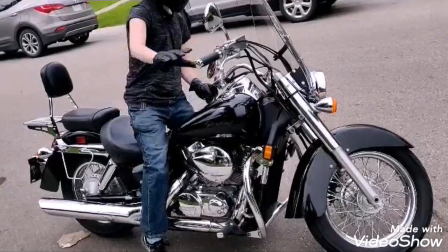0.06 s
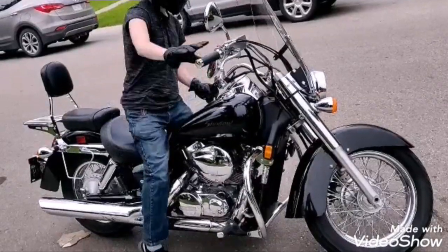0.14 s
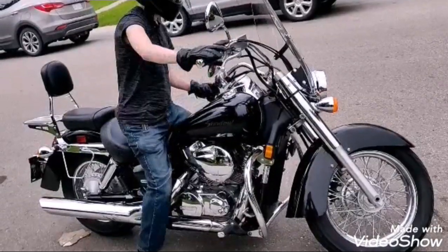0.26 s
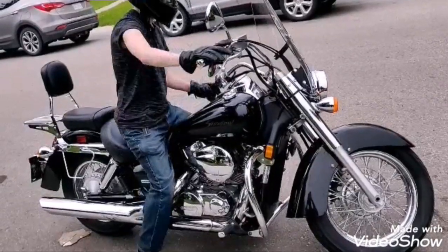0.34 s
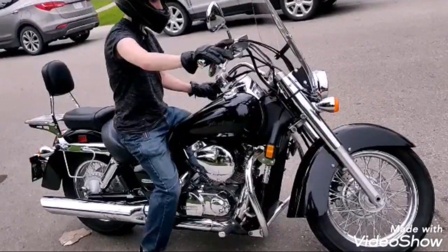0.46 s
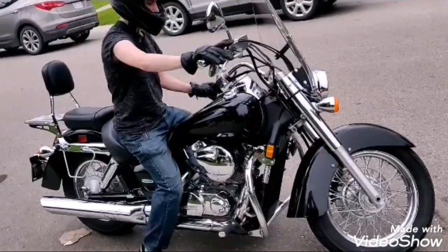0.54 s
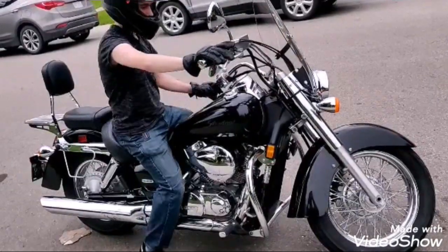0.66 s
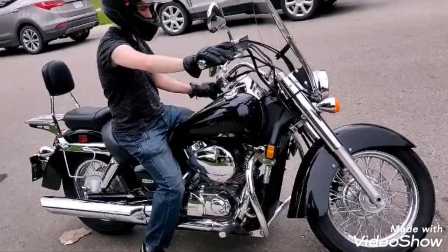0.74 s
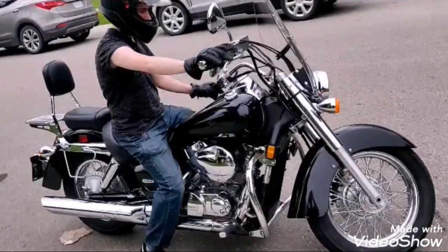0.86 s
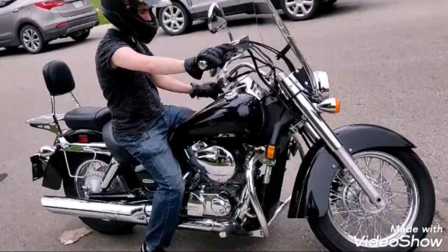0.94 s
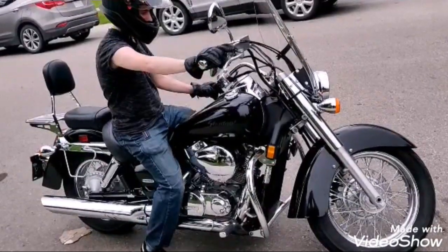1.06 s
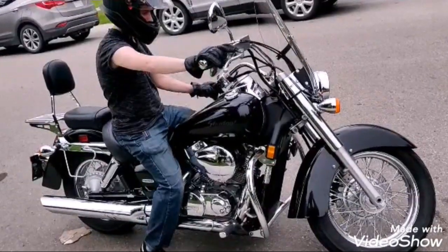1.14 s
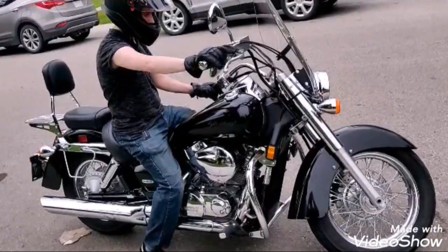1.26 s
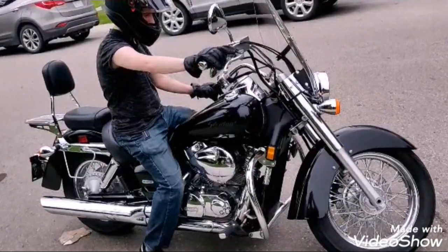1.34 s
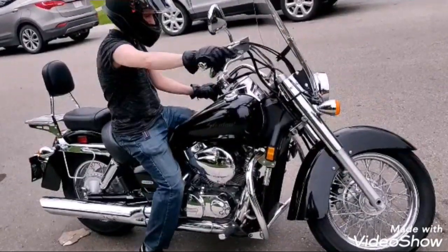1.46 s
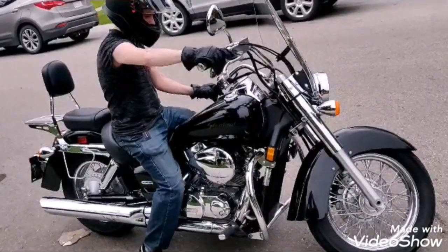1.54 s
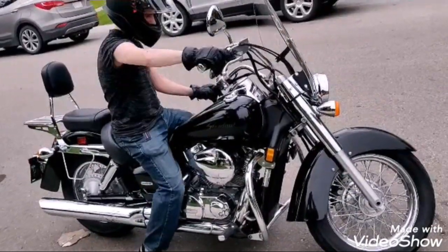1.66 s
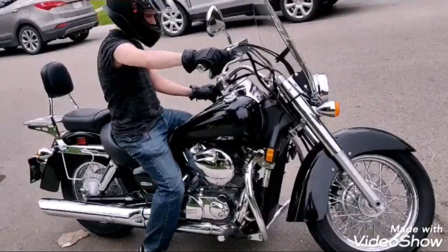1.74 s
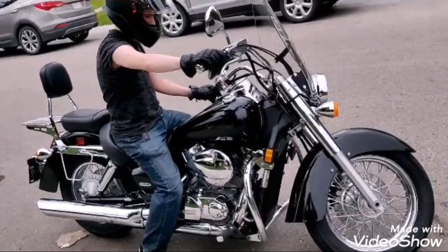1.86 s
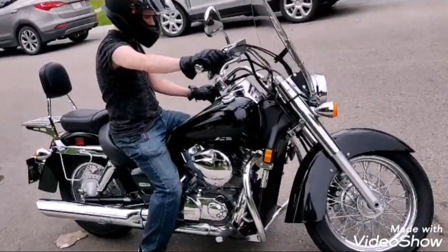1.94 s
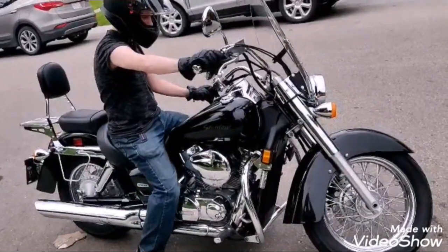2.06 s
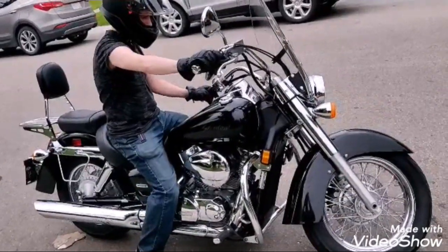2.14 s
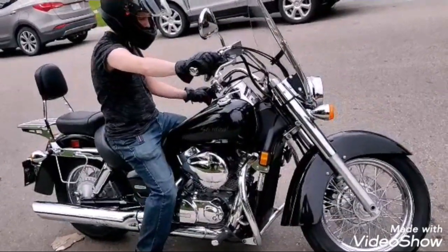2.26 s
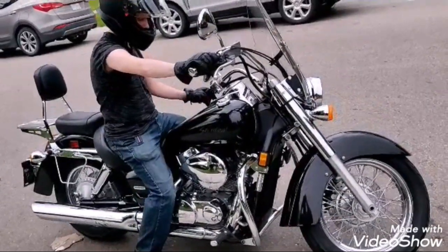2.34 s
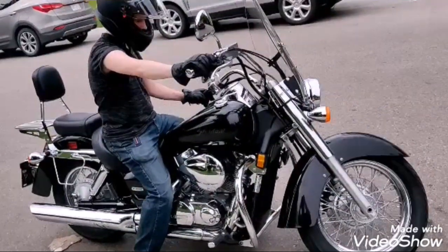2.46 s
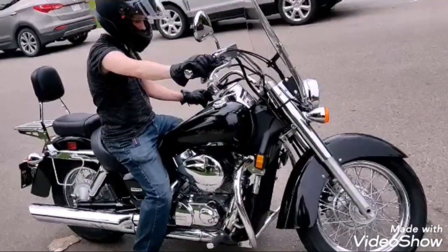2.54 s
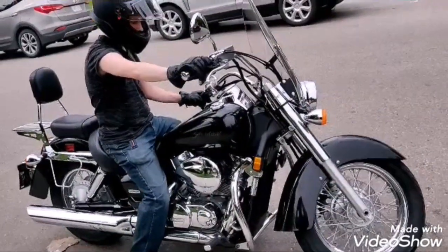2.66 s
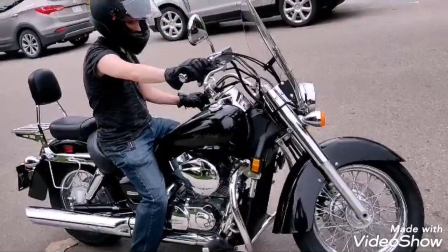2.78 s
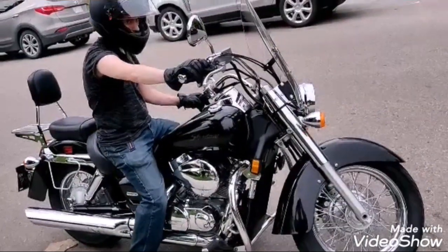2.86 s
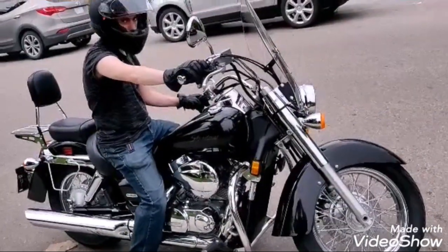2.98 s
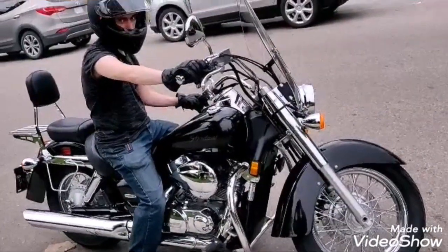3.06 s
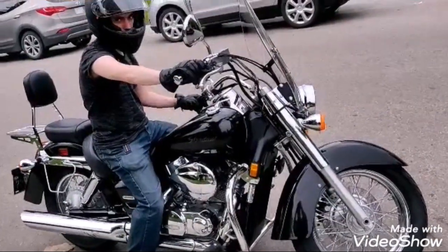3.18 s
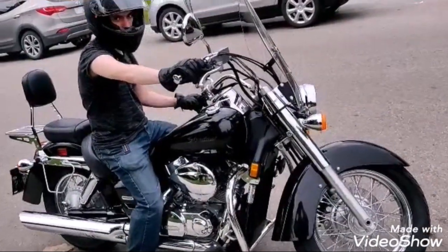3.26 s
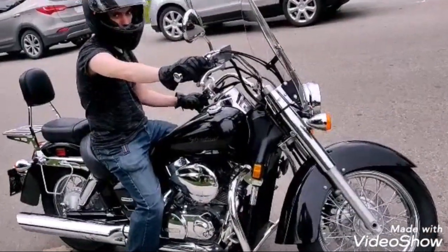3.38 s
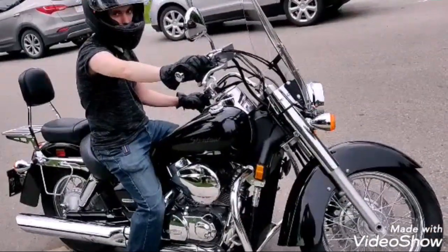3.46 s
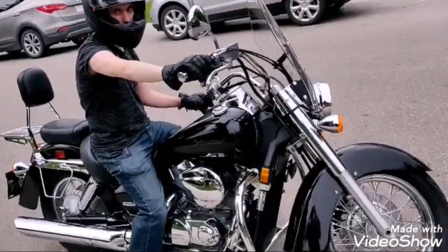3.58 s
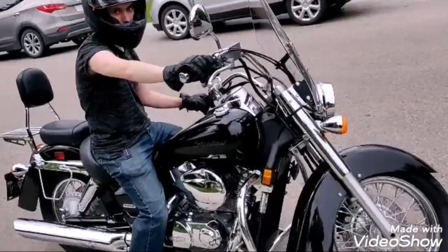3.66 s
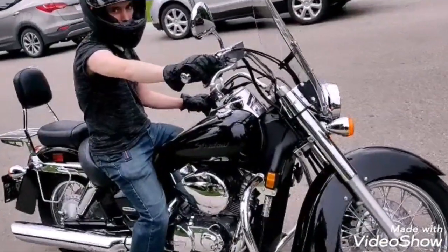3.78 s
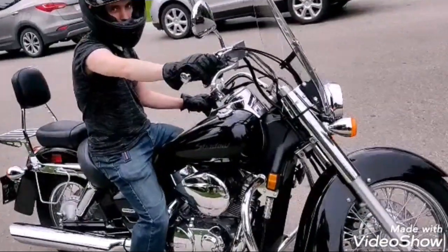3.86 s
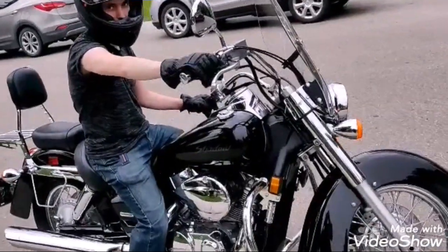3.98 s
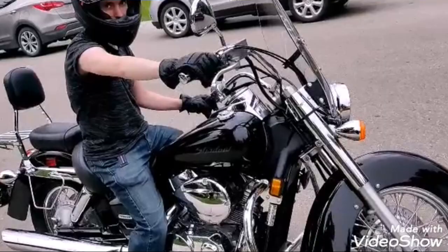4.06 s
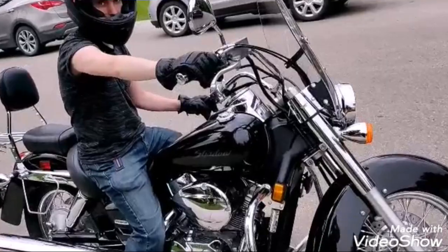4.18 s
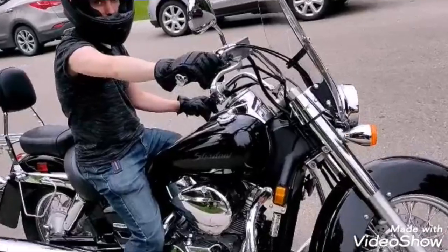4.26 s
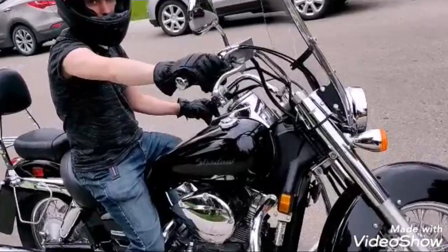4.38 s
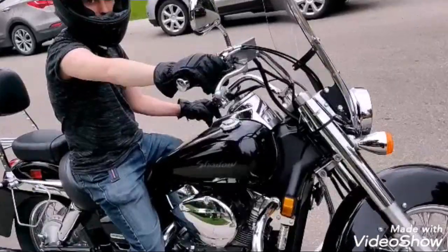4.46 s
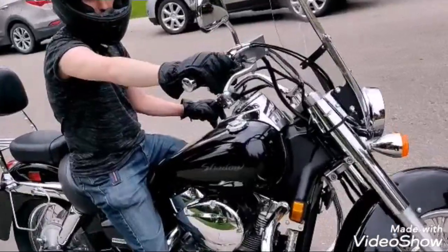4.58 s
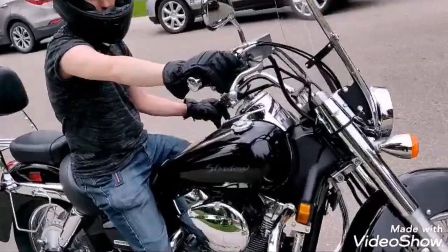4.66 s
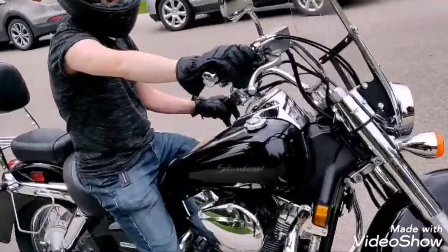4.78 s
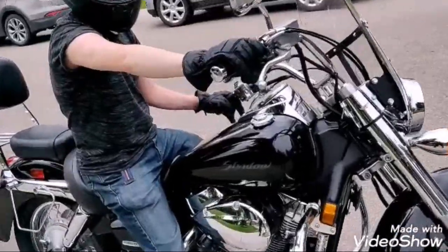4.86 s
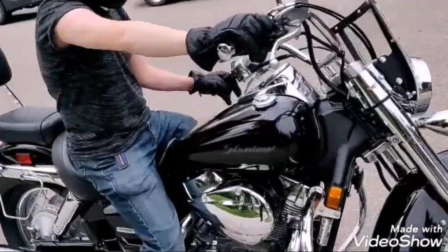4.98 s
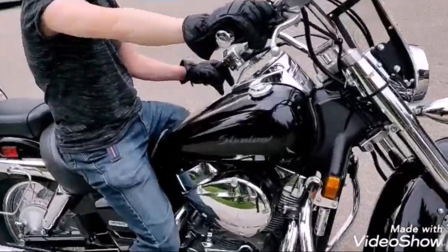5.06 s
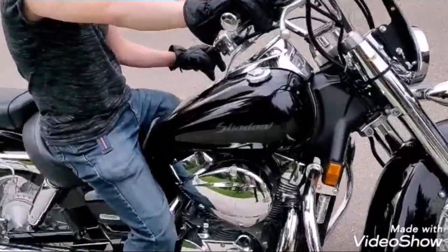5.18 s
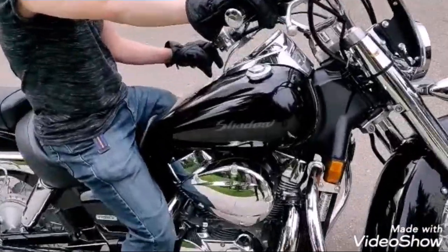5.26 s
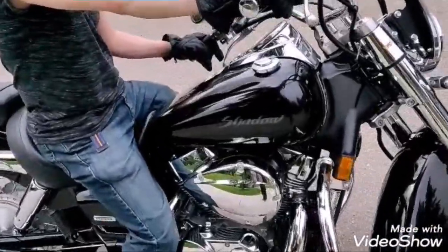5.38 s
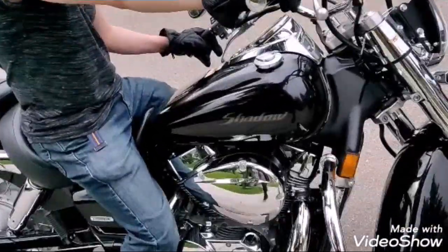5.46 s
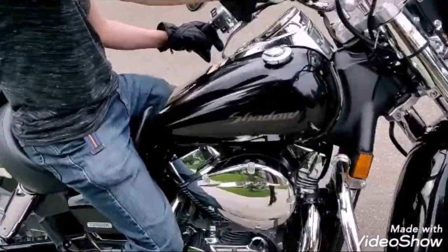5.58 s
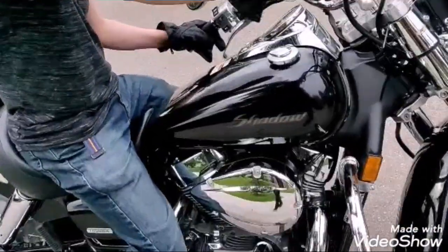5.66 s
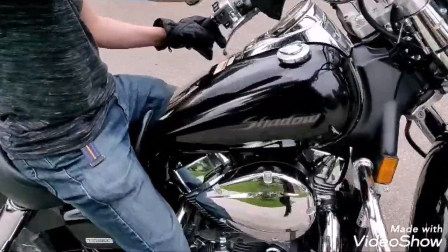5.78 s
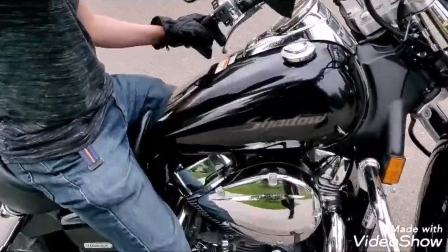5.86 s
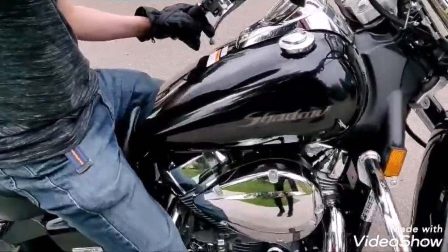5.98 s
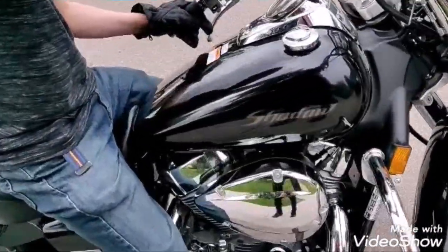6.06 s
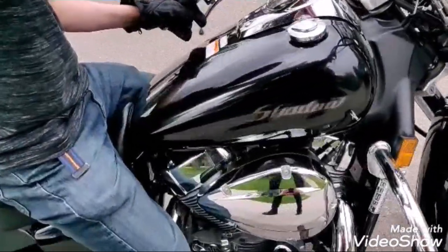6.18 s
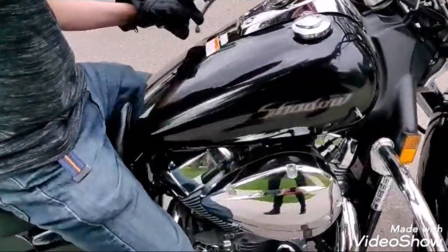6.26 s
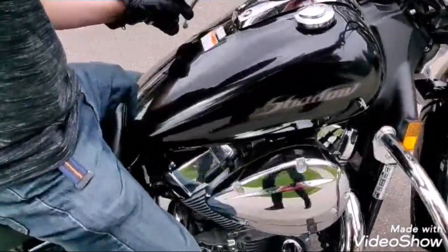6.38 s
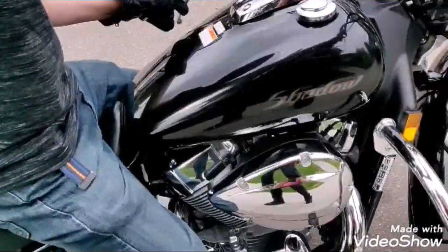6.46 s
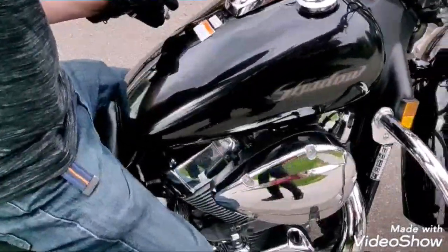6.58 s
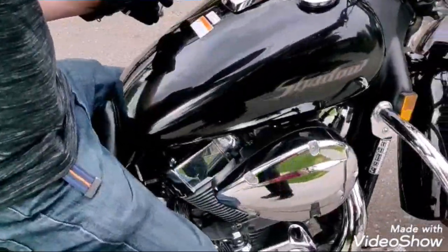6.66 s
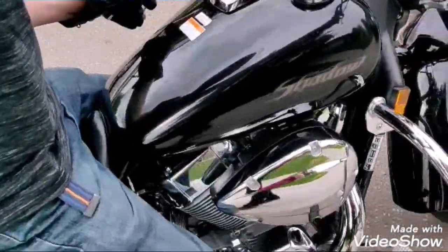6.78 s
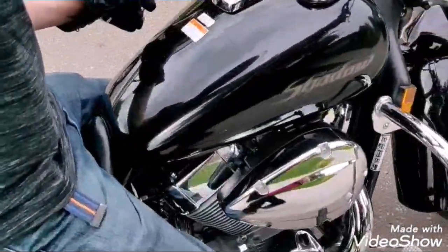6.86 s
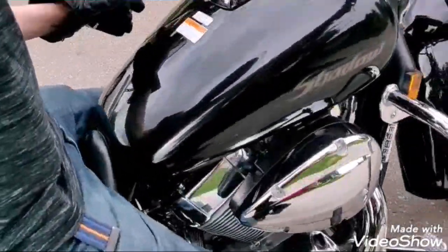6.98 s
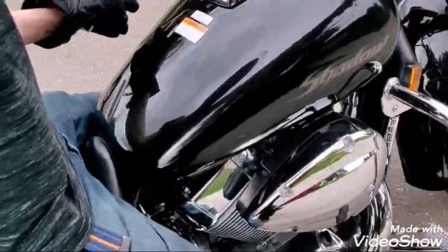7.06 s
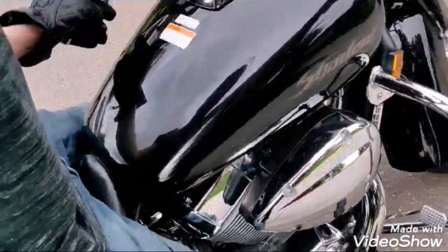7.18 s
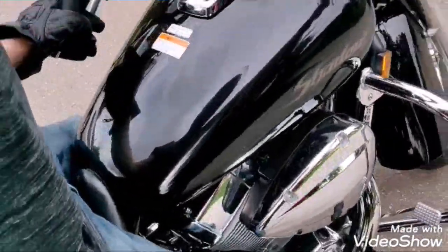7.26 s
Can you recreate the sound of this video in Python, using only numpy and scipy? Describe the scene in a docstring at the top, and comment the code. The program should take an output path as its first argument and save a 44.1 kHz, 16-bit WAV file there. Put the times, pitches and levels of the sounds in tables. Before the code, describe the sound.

Outdoors, a distant engine throbs very low under soft air noise. From 0 to 0.8 s clothes and seat rustle faintly, with small dry switch clicks around 0.3, 0.5 and 0.8. At 0.97 a ringing solenoid clack starts a short metallic grind, surging until about 1.3, when the big V-twin catches with a strong boom and settles into a deep, uneven, loping idle; a thin starter whine dies by 2.4. At 2.4 the throttle opens: a punchy roar climbs quickly, then holds high and raspy, with a panel hum near 3.7-4.1. Just before 4 it shuts; speed falls with a bark, cracks and deep thudding pops until 4.7. Idle returns as the microphone moves close, the low boom giving way to midrange thump, ticks and clatter. At 5.55 a second, lower rev rises and stays up to the end, with droning intake, a few loose metal ticks around 6-6.4, and ringing cover rattles.

```python
"""Motorcycle start and two revs

A rider settles on a V-twin cruiser; the starter grinds, and the engine catches, idles and is revved twice.
Uneven pairs of exhaust clicks ring resonances, the pipes; noise shaped by the crank makes intake and valves.
Shaped noise and a thin, fading whine make the starter; short noise bursts make cloth rubs and switch clicks.
Far behind, steady low tones make another idling engine over soft outdoor noise."""
import sys
import numpy as np
from scipy import signal
from scipy.fft import rfft, irfft
from scipy.io import wavfile
from scipy.ndimage import uniform_filter1d

SR = 44100
rng = np.random.default_rng(int(sys.argv[2]) if len(sys.argv) > 2 else 0)


def inscribe(sig):
    """Save sig as 16-bit PCM at rate SR to the path in sys.argv[1].

    A 1-D sig is mono; a 2-D sig holds one channel per row.
    Samples are clipped to [-1, 1] before scaling.
    """
    pcm = np.round(np.clip(np.atleast_2d(sig).T, -1, 1) * 32767)
    wavfile.write(sys.argv[1], SR, pcm.astype(np.int16))


N = 322812
TIME = np.arange(N) / SR
FREQS = np.maximum(np.arange(N // 2 + 1) * SR / N, 1)
PORT_LAG_S = 0.0004356   # noise and loose ticks reach the left microphone port first

# exhaust resonances in three groups, low to high
# [f/Hz, width f/Hz, level/dB a few steps away, level/dB beside the tank]
BOOM_MODES = [(52.4, 18, 5, -20), (78.4, 14.6, 1.5, -40.5)]
THUMP_MODES = [(101.3, 31.4, 5.14, 13), (131.6, 47.6, 3.24, 7.5), (160.8, 37, 1.14, -3.5)]
BARK_MODES = [(242.3, 15, 0, 2), (275.8, 43, -2, 0.5), (312.5, 47, -0.5, -0.5), (344.6, 20, -1, -3),
              (411.7, 18.8, -1.5, -6), (516, 58, -15, -19), (726, 62, -12.5, -13)]
REAR_DELAY = .397   # share of a cycle between the front and the rear firing
VALVE_LEAD_S = .015   # the exhaust valve opens this long before the pipe cracks
TURBULENCE = .028


def exhaust(cycles, gain, rear_db=3.0, crack_low_hz=230, crack_high_hz=720, thud_hz=97, thud_width_hz=30):
    """Two unevenly spaced firings a cycle give the lope; with the throttle shut they crack and thud."""
    early = np.interp(TIME + VALVE_LEAD_S, TIME, cycles)
    front = blowdown(early, 0, TURBULENCE)
    rear = from_db(rear_db) * blowdown(early, REAR_DELAY, TURBULENCE)
    pulses = front + rear
    boom = gain["boom"] * pipes(pulses, BOOM_MODES, low_hz=32.0, high_hz=105, hold=0.95)
    thump = gain["thump"] * pipes(pulses, THUMP_MODES, low_hz=66.4, high_hz=235, hold=0.28)
    bark = gain["bark"] * pipes(pulses, BARK_MODES, low_hz=181, high_hz=835, hold=0.07)
    pops = sum(strokes(cycles, at, spread_db=5, jitter_s=.0004) for at in (0, REAR_DELAY))
    cracks = gain["cracks"] * even(butter(pops, [crack_low_hz, crack_high_hz], "band", order=3))
    thuds = gain["thuds"] * even(butter(resonate(pops, thud_hz, thud_width_hz), 203, "low"))
    return boom + thump + bark + cracks + thuds + gain["roar"] * roar(cycles)


def blowdown(cycles, offset, turbulence, puff_s=0.036, push=1.0):
    """An exhaust valve opens with a rough puff; at low speed the piston's later push is heard too."""
    clicks = strokes(cycles, offset, spread_db=1.3, jitter_s=.0003)
    shove = strokes(cycles, offset + 0.322, spread_db=1.2, jitter_s=0.0004)
    puff = turbulence * fade(clicks, puff_s) * rng.standard_normal(N)
    return clicks + roughness(cycles) * (puff + push * butter(shove, 140, "low"))


# the microphone walks up to the tank [t/s, share of the way 0-1]
APPROACH = [(4.7, 0.026), (6.0, 0.87), (7.3, 0.77)]


def pipes(pulses, modes, low_hz, high_hz, hold):
    """The firings ring a group of resonances whose balance depends on where one stands."""
    near, = in_time(APPROACH)
    x = 0
    for k, (hz, width, side_db, tank_db) in enumerate(modes):
        level_db = side_db + near * (tank_db - side_db)
        x = x + (-1) ** k * from_db(level_db) * resonate(pulses, hz, width)
    return even(butter(butter(x, low_hz, "high"), high_hz, "low", order=3), hold)


def roar(cycles, puff_s=.007):
    """Every firing leaves the pipe with a puff of turbulent noise."""
    puffs = fade(sum(strokes(cycles, at, spread_db=18, jitter_s=0.00093) for at in (0, REAR_DELAY)), puff_s)
    return puffs * rms_one(butter(rng.standard_normal(N), [290, 680], "band", order=3))


# the loudest afterfire pops as the revs fall [t/s, level/dB before the shared thud_db]
POPS = [(4.008, -3.5), (4.409, 1), (4.488, -4.5), (4.549, 3), (4.602, -6.5), (4.661, 3.5)]


def afterfire(thud_hz=98, width_hz=32, thud_db=-7):
    """Unburnt fuel pops in the pipe with a deep thud: single clicks ring one low resonance."""
    clicks = np.zeros(N)
    for s, db in POPS:
        clicks[int(s * SR)] = from_db(db + thud_db)
    return butter(resonate(clicks, thud_hz, width_hz), 400, "low") * SR / (2 * np.pi * width_hz)


# the engine catches, flares a little and settles to idle (speeds in four-stroke cycles per second)
CATCH_S, IDLE_HZ, FLARE_HZ, FLARE_S = 1.325, 10.232, .615, .2
# with the throttle shut the speed decays in FALL_S, gently at first as the manifold empties
FALL_S, FALL_POWER = .58, 1.556
# throttle twists; the second is held to the end
# [opened t/s, shut t/s, speed f/Hz it heads for, spin-up time t/s]
REVS = [(2.39, 3.942, 35.642, .407), (5.556, 7.4, 25.773, .431)]


def engine_speed():
    """Each twist draws the speed up toward its top; friction then brings it back to idle."""
    speed = IDLE_HZ + FLARE_HZ * np.exp(-np.maximum(TIME - CATCH_S, 0) / FLARE_S)
    for opened, shut, top_hz, rise_s in REVS:
        open_for = np.clip(TIME, opened, shut) - opened
        gained = (top_hz - IDLE_HZ) * (1 - np.exp(-open_for / rise_s))
        speed = speed + gained * np.exp(-(np.maximum(TIME - shut, 0) / FALL_S) ** FALL_POWER)
    return speed


def crank(speed):
    """Engine cycles completed since the first firing."""
    return np.cumsum(speed * (TIME >= CATCH_S)) / SR


# the throttle takes a moment to open, and the exhaust swells this long after the twist
OPENING_S, PULL_S, PULL_LAG_S = 0.11, 0.32, 0.019
# the exhaust note changes this long after the throttle shuts, and this quickly; the snap is brief
NOTE_LAG_S, NOTE_CHANGE_S, SNAP_S = 0.051, 0.031, 0.14
# overrun (spinning on with the throttle shut) lasts until the speed nears idle
OVERRUN_END_HZ, OVERRUN_FADE_HZ = 13.2, 3.5


def throttle(speed):
    """Three states: pulling up to speed, overrunning with the throttle shut, and the moment of shutting."""
    pull, closed, snap = 0, 1, 0
    hardest_hz = max(top_hz for _, _, top_hz, _ in REVS)
    for opened, shut, top_hz, _ in REVS:
        opening = (1 + np.tanh((TIME - opened - PULL_LAG_S) / OPENING_S)) / 2
        pull = pull + top_hz / hardest_hz * opening * np.exp(-np.maximum(TIME - opened, 0) / PULL_S)
        since = np.maximum(TIME - shut - NOTE_LAG_S, 0) / SNAP_S
        closed = closed - (TIME > opened) * np.exp(-(since * SNAP_S / NOTE_CHANGE_S) ** 2)
        snap = snap + since * np.exp((1 - since ** 2) / 2)
    overrun = closed * np.clip((speed - OVERRUN_END_HZ) / OVERRUN_FADE_HZ, 0, 1)
    return pull, overrun, snap


# the rich first firings hold and fade
FIRST_HOLD_S, FIRST_FADE_S = 0.13, 0.019
# cracks stand out more as the engine slows; thuds are strongest while it still spins fast
CRACK_DB, CRACK_DB_PER_DOUBLING = -31, -2
THUD_DB, THUD_DB_PER_DOUBLING = -23, 8.5
# levels of each part of the running engine
# [idle level/dB, then level/dB added: per doubling of speed, pulling, on overrun,
#  as the throttle snaps shut, on the first firings, beside the tank]
PART_LEVELS = {"boom": (-22, 3.5, -5.5, 5.5, -9, 7, 5.5), "thump": (-25.5, 5, 19, -2, 2, 7, 2.5),
               "bark": (-41, 9, 5.5, -10.5, 10, 3, 0), "roar": (-42.5, 7.5, 12.5, 1, 7, 8, -11.5),
               "hum": (-43.5, -2, 3, -18, -9, -2, 5.5), "rasp": (-39, 6, 3.5, 0.5, -0.5, -1, 3.5),
               "clatter": (-44, 7, 7, 1, -1.5, 0, 3), "gears": (-56, 8, -39, -10, 7, 4.5, 7)}


def part_gains(speed):
    """The gain of every part follows the speed, the throttle and where one stands."""
    doublings = np.log2(speed / IDLE_HZ)
    pull, overrun, snap = throttle(speed)
    first = np.exp(-np.maximum(TIME - CATCH_S - FIRST_HOLD_S, 0) / FIRST_FADE_S)
    near, = in_time(APPROACH)
    states = np.array([np.ones(N), doublings, pull, overrun, snap, first, near])
    gains = {part: from_db(np.dot(db, states)) for part, db in PART_LEVELS.items()}
    gains["cracks"] = overrun * from_db(CRACK_DB + CRACK_DB_PER_DOUBLING * doublings)
    gains["thuds"] = overrun * from_db(THUD_DB + THUD_DB_PER_DOUBLING * doublings)
    return gains


# burning is unsteady at idle (roughness 0-1) and steadies as a power of the speed
IDLE_ROUGH, STEADYING = 0.55, 1.6


def roughness(cycles):
    """The faster the crank turns, the more alike the firings."""
    speed = np.maximum(np.gradient(cycles) * SR, IDLE_HZ)
    return np.clip(IDLE_ROUGH * (IDLE_HZ / speed) ** STEADYING, 0, 1)


def strokes(cycles, offset, spread_db, jitter_s):
    """One click a cycle at a given crank position, each a little different in strength and time."""
    at = np.searchsorted(cycles, np.arange(int(cycles[-1]) + 1) + offset, side="right")
    at = at[at < N]
    size, late = rng.standard_normal((len(at), 2)).T
    rough = roughness(cycles)[at]
    shifted = at + (late * rough * jitter_s * SR).astype(int)
    clicks = np.zeros(N)
    clicks[np.clip(shifted, 0, N - 1)] = from_db(spread_db * rough * np.minimum(size, 1))
    return clicks


# colours of the intake noise and of the valve noise [f/Hz, level/dB per Hz]
RASP_COLOUR = [(290, 9.5), (500, 0.5), (747, -6), (920, -8), (1140, -3), (1250, -8), (2150, -7.5),
               (2690, -13), (3400, -15), (4420, -35.5), (7480, -120)]
CLATTER_COLOUR = [(1530, -79.5), (2600, -12), (3920, -3), (6240, 1.5), (7450, -6.5), (8960, -11.5),
                  (10800, -39.5), (22000, -120)]
# metal resonances of the engine case [f/Hz, width f/Hz, level/dB]
CASE_MODES = [(1112, 32, -16), (2206, 37, -7.5), (2400, 19, -12.5), (6130, 1000, 9)]
FREEWHEEL_DB = 11.5   # added to the clatter while the starter freewheels


def mechanics(cycles, gain, gulp=0.91, tick=0.54, rasp_low_hz=560):
    """The intake gulps twice a cycle; four valves tick over the hiss of chains and gears; the case hums."""
    gulps = fade(sum(strokes(cycles, at, spread_db=28.0, jitter_s=0.00025) for at in (.2, .61)), 0.0097)
    valve_clicks = sum(strokes(cycles, at, spread_db=18, jitter_s=0.0007) for at in (.12, .26, .34, .68))
    ticks = fade(valve_clicks, 0.0049)
    intake = gain["rasp"] * butter(hiss(RASP_COLOUR, CASE_MODES, lift_db=5.0), rasp_low_hz, "high")
    rasp = (1.7 + gulp * gulps) * (intake + gain["gears"] * gears(cycles))
    coasting = starter_spin()   # the starter's clutch freewheels after the engine catches
    valve_noise = np.sqrt(1 - coasting) * hiss(CLATTER_COLOUR, CASE_MODES, lift_db=3.0)
    clutch_noise = np.sqrt(coasting) * butter(hiss(GRIND_COLOUR), 1000, "high")
    metal = valve_noise + clutch_noise
    clatter = gain["clatter"] * from_db(FREEWHEEL_DB * coasting) * (1.26 + tick * ticks) * metal
    shaken = rng.standard_normal(N) * (0.2 + gulps)
    hum = gain["hum"] * even(resonate(resonate(shaken, 414, 7.1), 431, 54))
    return (cycles > 0) * (rasp + clatter + hum + cover(cycles))


def gears(cycles):
    """The primary drive sings higher as the engine speeds up."""
    return whirr(cycles + 0.00089 * drift(23), teeth=84.0, spread=21.5)


# covers heard from close by [f/Hz, width f/Hz, level/dB, nearest at t/s, half-length t/s]
COVER_MODES = [(762, 63, -26.5, 7.62, 0.46), (1140, 42, -39.5, 5.74, 0.42), (1610, 28, -36.5, 6.13, 0.42),
               (1892, 26, -36, 7.5, 0.46), (2120, 46, -37, 6.5, 0.31), (2170, 74, -40.5, 7.3, 0.47)]


def cover(cycles, clack_s=0.015):
    """A rattle each cycle rings the engine's covers; each ring swells as the microphone passes it."""
    clacks = fade(strokes(cycles, 0.14, spread_db=5, jitter_s=0.00022), clack_s)
    rattle = clacks * rng.standard_normal((2, N))
    out = 0
    for hz, width, db, s, half_s in COVER_MODES:
        ring = even(resonate(resonate(rattle, hz, width), hz, 10 * width))
        out = out + from_db(db) / np.cosh((TIME - s) / half_s) * ring
    return out


# drone of the air box [crank order, level/dB relative], and its loudness [t/s, level/dB]
DRONE_ORDERS = [(9, -4), (12, -1.5), (13, -7), (14, -6), (15, -6), (19, -10), (21, -15)]
DRONE_LEVEL = [(5.4, -93), (5.75, -26.5), (6.25, -32), (6.8, -24), (7.15, -30.5)]


def drone(cycles):
    """Close to the air box a few crank orders (tones per cycle) drone and glide up with the speed."""
    turns = cycles + 0.0018 * drift(6.7)
    lines = 0
    for order, db in DRONE_ORDERS:
        lines = lines + from_db(db) * np.sin(2 * np.pi * (order * turns + rng.random()))
    return from_db(in_time(DRONE_LEVEL)[0]) * rms_one(lines)


# near top speed a loose panel hums [t/s, level/dB]
PANEL_LEVEL = [(3.6, -68), (3.74, -17.5), (3.95, -13.5), (4.06, -14), (4.2, -72)]


def panel(cycles, order=8):
    """Near top speed one crank order shakes a loose panel, which hums."""
    return from_db(in_time(PANEL_LEVEL)[0]) * np.sin(2 * np.pi * order * cycles)


# loose metal beside the cylinder heads [t/s, level/dB before the shared TICK_DB, ring f/Hz]
TICKS = [(5.9953, -16.5, 1580), (6.1744, -22, 2120), (6.2223, -21, 2130), (6.3071, -20, 2140),
         (6.3594, -19, 2020)]
TICK_DB, TICK_RING_S = -1.5, 0.0053


def loose_ticks(rattle=0.24):
    """Each tick is a brief, slightly buzzing ring that reaches the left port first."""
    out, age = np.zeros((2, N)), np.arange(SR // 20) / SR
    for s, db, hz in TICKS:
        buzz = rms_one(resonate(rng.standard_normal(len(age)), hz, 900))
        ring = np.sin(2 * np.pi * hz * age) + rattle * buzz
        for port in (0, 1):
            at = int((s + port * PORT_LAG_S) * SR)
            out[port, at:at + len(age)] += from_db(db + TICK_DB) * ring * np.exp(-age / TICK_RING_S)
    return out


# starter grinding: one soft row through the whole cranking, then louder surges against compression;
# rumbles sound at up to 3 percent of the listed pitches
# [start t/s, end t/s, level/dB, lower rumble's base f/Hz, upper rumble's base f/Hz]
GRINDS = [(0.969, 1.342, -36.5, 1933, 6550), (1.014, 1.076, -31, 808, 6380),
          (1.118, 1.189, -26.5, 1294, 6660), (1.21, 1.229, -30, 1925, 6630),
          (1.248, 1.293, -25.5, 1570, 6410)]
# colour of grinding metal [f/Hz, level/dB per Hz]
GRIND_COLOUR = [(350, -32), (600, -29), (737, -3.5), (1050, -18), (1320, -4.5), (1490, -15), (1940, -12),
                (2320, -14.5), (6490, -5), (9210, -21.5), (10800, -45), (22000, -120)]
# metal resonances of the starter [f/Hz, width f/Hz, level/dB]
STARTER_MODES = [(1890, 73, 10), (2880, 58, -11), (4230, 28, -5), (4360, 17, -9), (5980, 64, 0)]
STARTER_SAG = .07   # the starter's pitch drops by this share over each row
WHINE_HZ, WHINE_LOADED_DB, WHINE_FREE_DB = 1950, -34, -41   # thin whine, under load and running free


def starter(shaft_hz=131, flutter_hz=51, flutter=0.2, tone_db=-9, lower_db=-4.5, upper_db=-3):
    """The pinion grinds and rumbles, surging against compression; a thin whine fades as the motor spins down."""
    power, rumbles, drag = 0, 0, 0
    for start, end, db, lower_hz, upper_hz in GRINDS:
        gate = (1 + np.tanh((TIME - start) / 0.0017)) * (1 + np.tanh((end - TIME) / 0.01)) / 4
        wobble = 1 - flutter * np.cos(2 * np.pi * flutter_hz * (TIME - start))
        load = from_db(db) * np.sqrt(gate) * wobble
        progress = np.clip((TIME - start) / (end - start), 0, 1) - .5
        power, drag = power + load ** 2, drag + gate * STARTER_SAG * progress
        glide = .06 * progress   # each rumble falls to zero pitch halfway and rises again
        lower = from_db(lower_db) * sing(lower_hz * glide, 52)
        upper = from_db(upper_db) * sing(upper_hz * glide, 136)
        rumbles = rumbles + load * (lower + upper)
    turns = np.cumsum(shaft_hz * (1 - drag + .015 * drift(22))) / SR
    meshes = np.diff(np.floor(2 * turns), prepend=0)   # two knocks a turn
    teeth = rms_one(1 + 1.2 * fade(meshes * rng.random(N), .0008))
    tone = from_db(tone_db) * whirr(turns, teeth=11.1, spread=3.1)
    grind = 2.25 * hiss(GRIND_COLOUR, STARTER_MODES, lift_db=9) + tone
    whine = sing(WHINE_HZ * (1 - drag + .003 * drift(8)), 70)
    whine_db = np.where(TIME < CATCH_S, WHINE_LOADED_DB, WHINE_FREE_DB)
    return teeth * (np.sqrt(power) * grind + rumbles) + from_db(whine_db) * starter_spin() * whine


STARTER_ON_S, STARTER_REST_S, SPIN_DOWN_S = 1, 2.434, 0.87


def starter_spin():
    """1 while the starter turns, falling to 0 as it comes to rest."""
    return (TIME > STARTER_ON_S) * np.clip((STARTER_REST_S - TIME) / SPIN_DOWN_S, 0, 1)


# ringing of the starter's solenoid (its magnetic switch) [f/Hz, width f/Hz, level/dB]
SOLENOID_MODES = [(2040, 220, 6), (3670, 230, -3), (4900, 300, 3), (6700, 190, -4)]
SOLENOID_S, SOLENOID_DB = 0.970, -26.5


def solenoid(clack_s=0.0055):
    """The starter engages with a ringing clack: noise that starts at once and dies away."""
    clack = (TIME > SOLENOID_S) * np.exp(-np.abs(TIME - SOLENOID_S) / clack_s)
    return from_db(SOLENOID_DB) * clack * hiss(SWITCH_COLOUR, SOLENOID_MODES, lift_db=21)


# clicks of the controls [t/s, level/dB]
CLICKS = [(0.307, -32.5), (0.317, -35), (0.356, -34.5), (0.539, -39), (0.779, -36.5)]
# clothes and gloves rub, the seat rustles under the rider [middle t/s, half-length t/s, level/dB]
RUBS = [(0.12, 0.11, -61), (0.335, 0.084, -50), (0.66, 0.16, -57)]
SEAT_RUSTLES = [(0.34, 0.057, -46.5), (0.534, 0.031, -42.5)]
# colours of cloth and of switches [f/Hz, level/dB per Hz]
CLOTH_COLOUR = [(1060, -8), (1800, -15.5), (3150, -18), (6180, -6), (6890, -13), (10000, -28.5),
                (22000, -120)]
SWITCH_COLOUR = [(600, 1), (2000, -18), (3600, -3), (5000, 1), (6100, 9), (7200, -19), (9500, -24),
                 (12000, -62)]


def rider(click_s=0.0058):
    """Cloth rubs, the seat rustles and switches click before the engine runs."""
    clicks = np.zeros(N)
    for s, db in CLICKS:
        clicks[int(s * SR)] = from_db(db)
    cloth = rubbing(RUBS) * hiss(CLOTH_COLOUR)
    seat = rubbing(SEAT_RUSTLES) * butter(hiss(RASP_COLOUR), 530, "high")
    return cloth + seat + fade(clicks, click_s) * hiss(SWITCH_COLOUR)


def rubbing(rows):
    """Each rub swells and fades, with an uneven level."""
    swells = sum(from_db(db) / np.cosh((TIME - s) / half_s) for s, half_s, db in rows)
    return from_db(2.6 * drift(40)) * swells


# distant idling engine [f/Hz, rms level/dB]
DISTANT_TONES = [(27, -40), (49.5, -35), (55.7, -41.5), (75, -40), (98, -42)]
# colour of the outdoor noise [f/Hz, level/dB per Hz]
AIR_COLOUR = [(76, -35), (130, 2.5), (398, -10), (4000, -32), (5200, -89.5), (8800, -120)]
AIR_DB = -50


def street():
    """A distant engine throbs, as a few wavering tones, over soft outdoor noise."""
    wander = 0.0011 * drift(7.5)
    throb = 0
    for hz, db in DISTANT_TONES:
        tone = np.sin(2 * np.pi * (hz * (TIME + wander) + rng.random()))
        throb = throb + np.sqrt(2) * from_db(db) * tone
    return throb + from_db(AIR_DB) * hiss(AIR_COLOUR)


# likeness of the noise at the two microphone ports [f/Hz, likeness 0-1]
LIKENESS = [(500, 0.55), (2000, 0.45), (5000, 0.12)]


def hiss(spectrum, peaks=(), lift_db=0):
    """Stereo noise of a given colour, lifted at the resonances of a body."""
    mid, side = rfft(rng.standard_normal((2, N)))
    db = by_hz(spectrum)
    for hz, width, peak_db in peaks:
        db = db + lift_db * from_db(peak_db / 10) / (1 + (2 * (FREQS - hz) / width) ** 2)
    alike = np.clip(by_hz(LIKENESS), 0, .9)
    turn = 2 * np.pi * FREQS * PORT_LAG_S
    ports = np.sqrt(1 + alike) * mid + np.sqrt(1 - alike) * side * [[1], [-1]]
    ports = ports * np.exp(-1j * turn * [[0], [1]])   # delays the right port
    return rms_one(irfft(from_db(db) * ports / np.sqrt(1 + alike * np.cos(turn) / 2), N))


def whirr(turns, teeth, spread, size=4096):
    """Teeth mesh at a fixed multiple of a shaft's turn; their errors repeat each turn and make sidebands."""
    orders = np.arange(size // 2 + 1)
    errors = rfft(rng.standard_normal((2, size))) / (1 + ((orders - teeth) / spread) ** 4)
    place = turns % 1 * size
    return rms_one(np.array([np.interp(place, np.arange(size), side) for side in irfft(errors)]))


def sing(hz, width_hz):
    """A narrow, wavering ring of scraped metal whose pitch may glide."""
    a, b = butter(rng.standard_normal((2, N)), width_hz / 2, "low")
    phase = 2 * np.pi * np.cumsum(hz * np.ones(N)) / SR
    return rms_one(a * np.cos(phase) + b * np.sin(phase))


def even(x, hold=1):
    """Hold the loudness near 1 over a few cycles; with less hold it swells as a harmonic crosses a resonance."""
    x = rms_one(x)
    power = uniform_filter1d(uniform_filter1d(x * x, size=SR // 10), size=SR // 10)
    return x / np.sqrt(np.abs(power) + 1e-14) ** np.clip(hold, 0, 1)


def fade(clicks, seconds):
    """Each click opens an envelope that dies away."""
    return signal.lfilter([1], [1, -np.exp(-1 / (seconds * SR))], clicks + 1e-18)


def resonate(x, hz, width_hz):
    """Two-pole resonance with gain 1 on top."""
    r = np.exp(-np.pi * width_hz / SR)
    top = np.array([1, 0, -1]) * (1 - r * r) / 2
    return signal.lfilter(top, [1, -2 * r * np.cos(2 * np.pi * hz / SR), r * r], x + 1e-18)


def butter(x, hz, kind, order=2):
    """Causal Butterworth filter."""
    return signal.sosfilt(signal.butter(order, hz, kind, fs=SR, output="sos"), x + 1e-18)


def drift(hz):
    """Slow chance with spread 1."""
    return rms_one(irfft(rfft(rng.standard_normal(N)) / (1 + (FREQS / hz) ** 2), N))


def from_db(db):
    """Decibels to gain."""
    return 10 ** (np.asarray(db) / 20)


def rms_one(x):
    """Scale so that the mean of the channels has rms 1."""
    return x / np.sqrt(np.mean(np.atleast_2d(x).mean(0) ** 2) + 1e-20)


def in_time(rows):
    """Each column of a curve at every sample."""
    s, *columns = np.transpose(rows)
    return [np.interp(TIME, s, c) for c in columns]


def by_hz(points):
    """A spectrum table at every frequency."""
    hz, value = np.transpose(points)
    return np.interp(np.log(FREQS), np.log(hz), value)


def scene():
    """The motorcycle, its rider and the street."""
    speed = engine_speed()
    cycles, gain = crank(speed), part_gains(speed)
    engine = exhaust(cycles, gain) + afterfire() + panel(cycles) + drone(cycles) + mechanics(cycles, gain)
    return engine + loose_ticks() + solenoid() + starter() + rider() + street()


# colour difference of the two microphone ports [f/Hz, left over right level/dB]
LEAN = [(60, 2.5), (96, 3.5), (150, 3), (240, 3), (390, 0), (620, 2.5), (990, 3.5), (1590, 4.5), (2540, 5),
        (4050, -0.5), (6470, 9.5), (10300, -22.5)]
CUTOFF_HZ = 10400


def record(dry, top=1.0):
    """The two microphone ports colour the sound differently; peaks are rounded and the top is cut."""
    ratio = from_db(by_hz(LEAN))
    port_gains = 2 * np.array([ratio, np.ones_like(ratio)]) / (1 + ratio)
    ports = irfft(rfft(dry) * port_gains, N)
    rounded = ports / (1 + (ports / top) ** 4) ** .25
    return signal.sosfilt(signal.ellip(8, .3, 70, CUTOFF_HZ, fs=SR, output="sos"), rounded)


dry = scene()
out = record(dry)
inscribe(out)
```